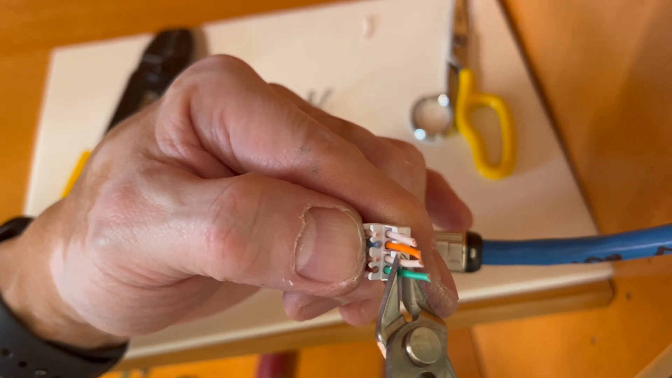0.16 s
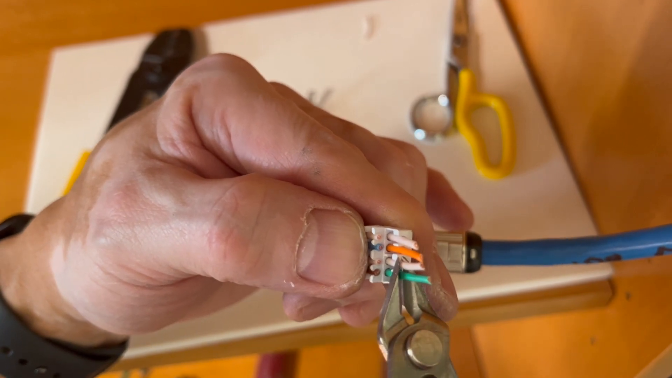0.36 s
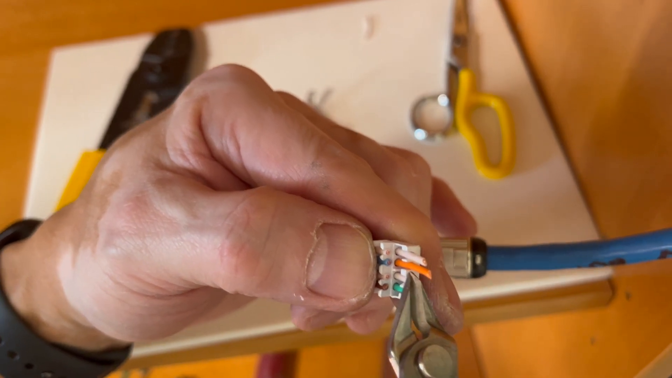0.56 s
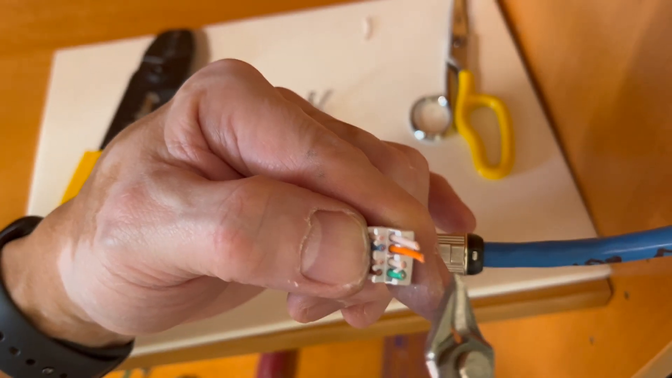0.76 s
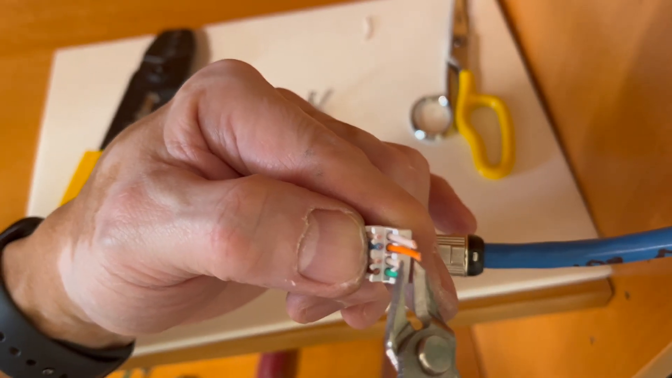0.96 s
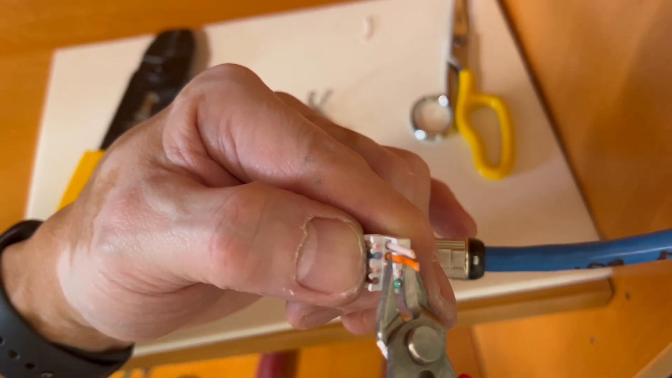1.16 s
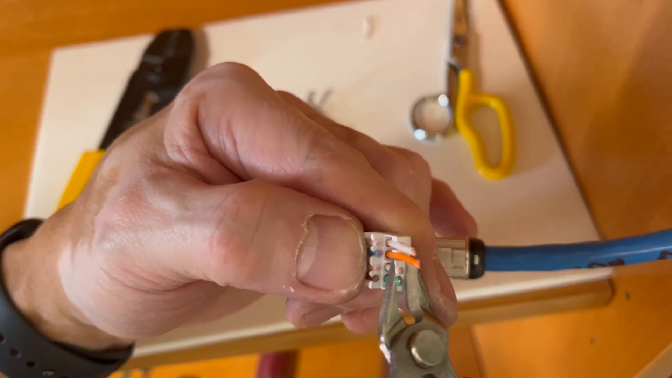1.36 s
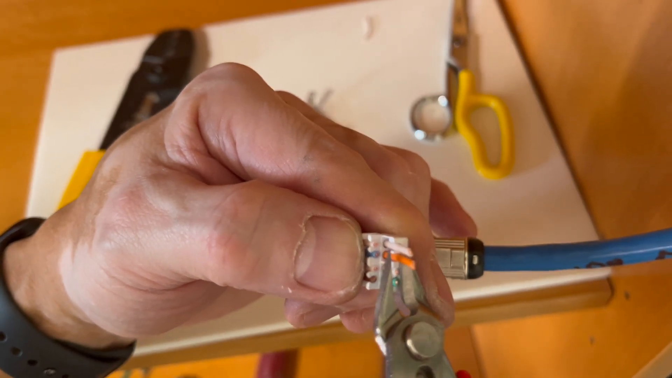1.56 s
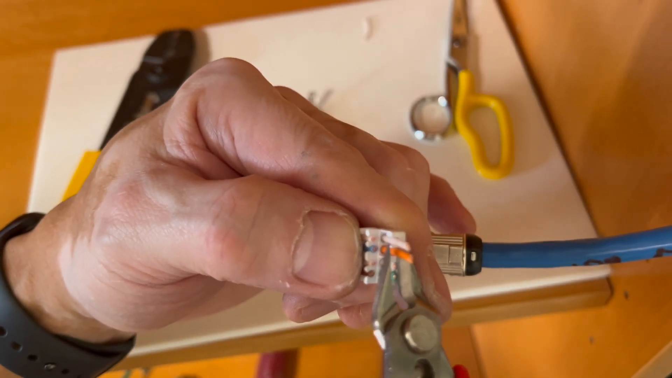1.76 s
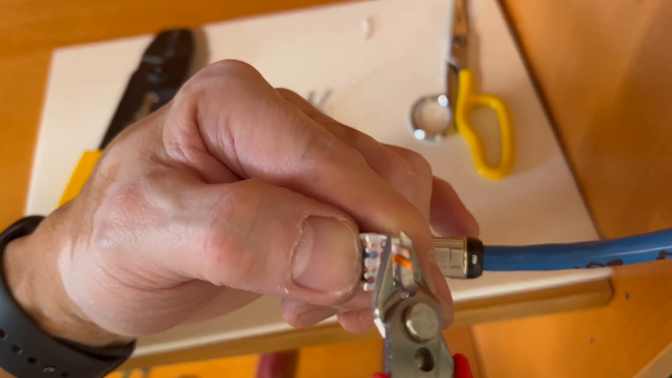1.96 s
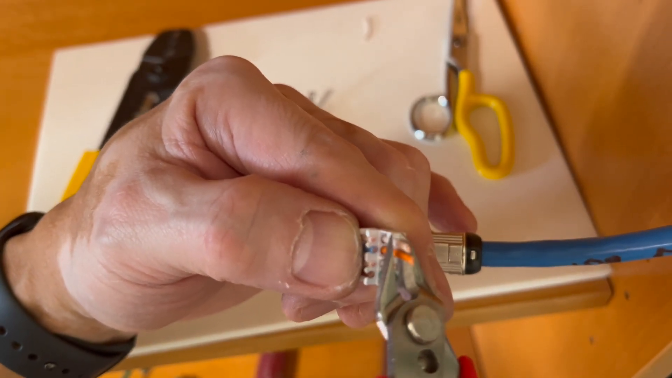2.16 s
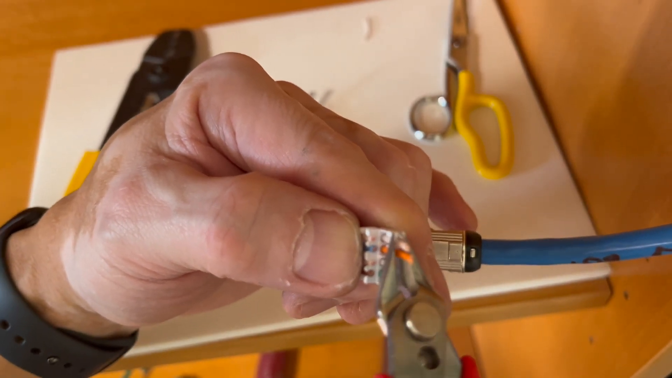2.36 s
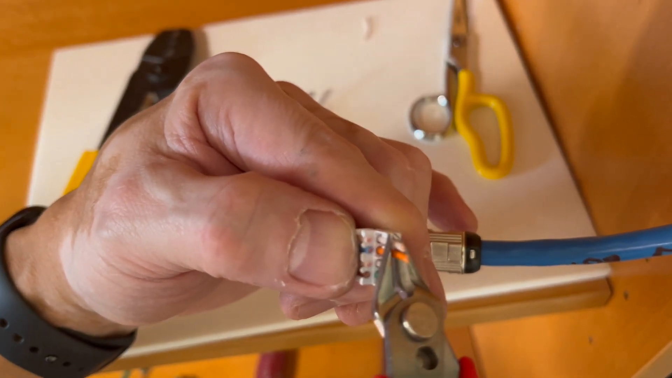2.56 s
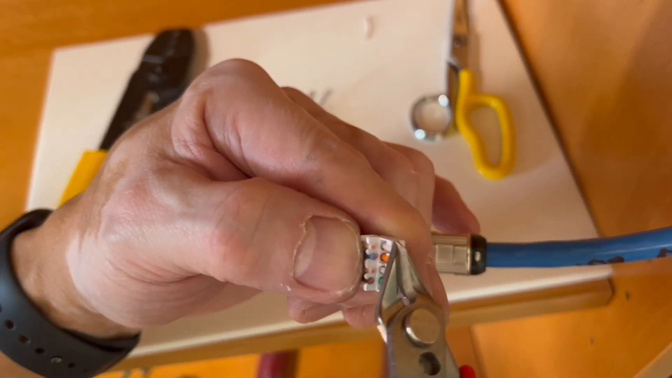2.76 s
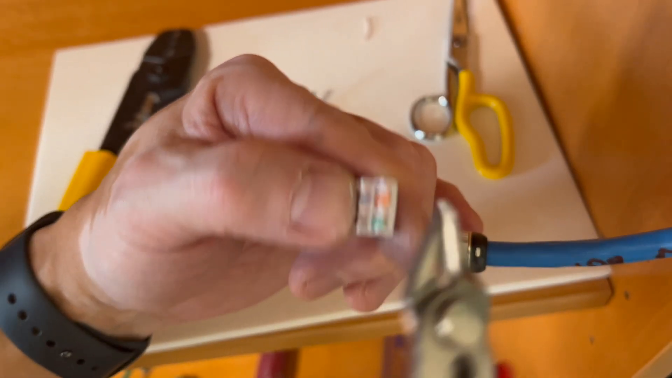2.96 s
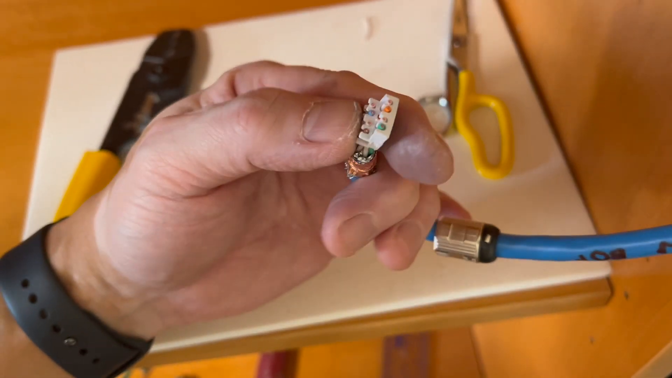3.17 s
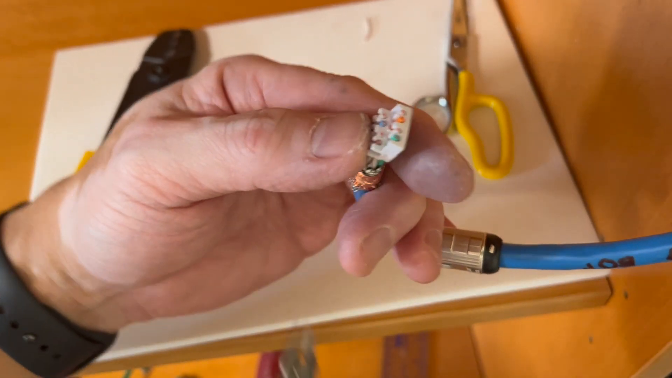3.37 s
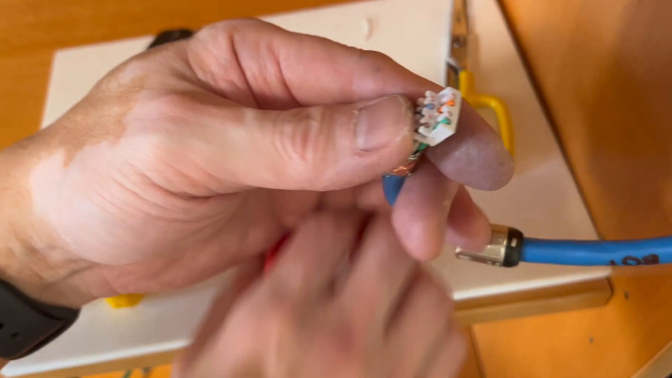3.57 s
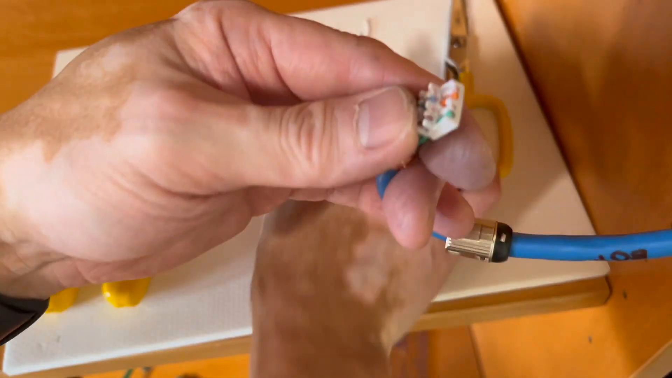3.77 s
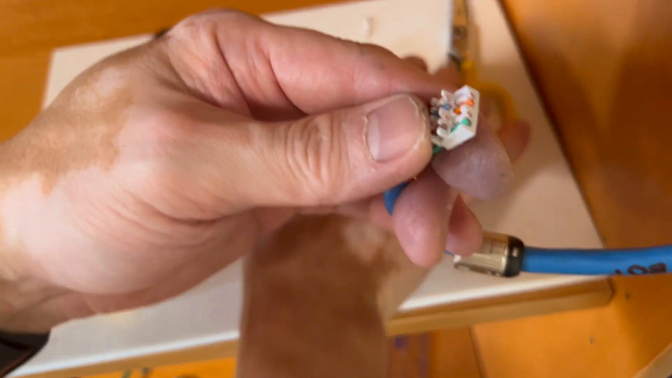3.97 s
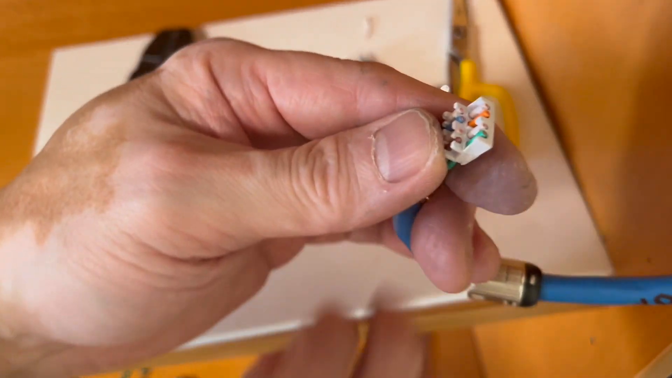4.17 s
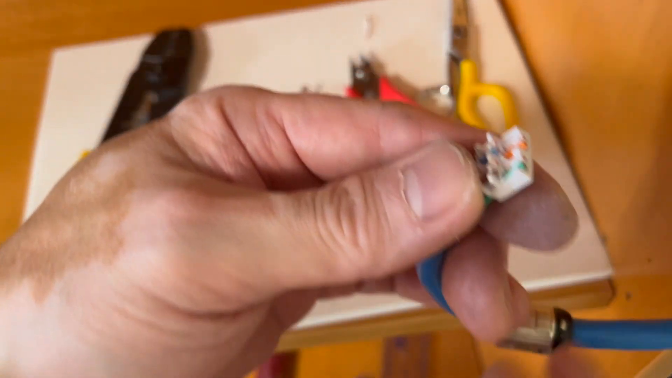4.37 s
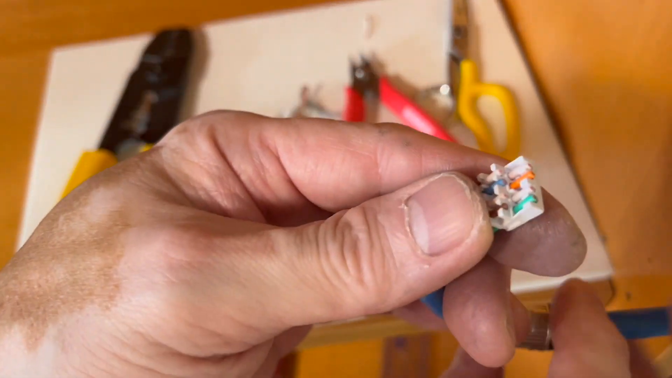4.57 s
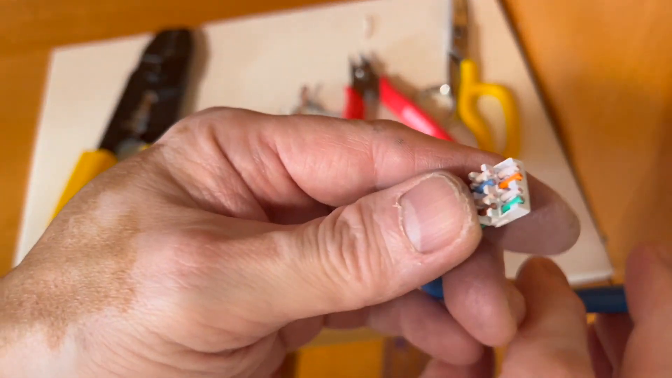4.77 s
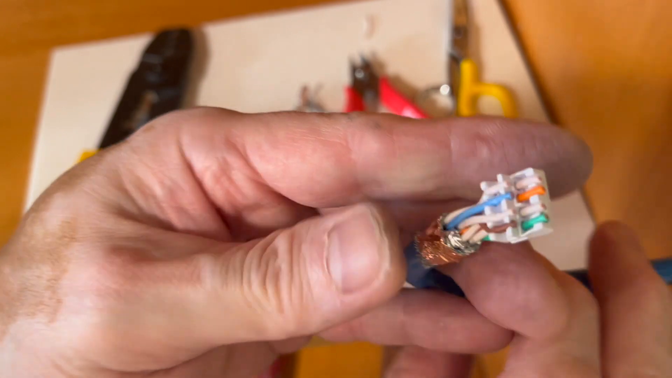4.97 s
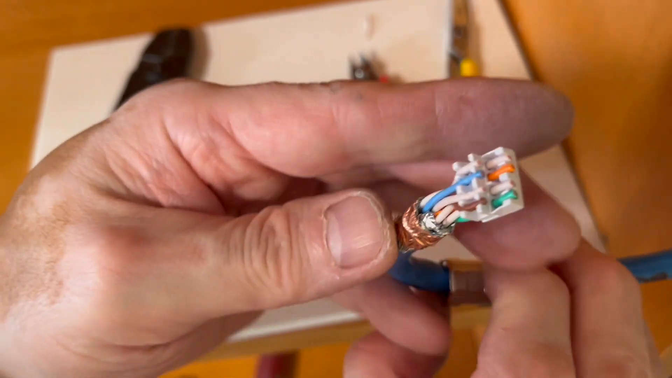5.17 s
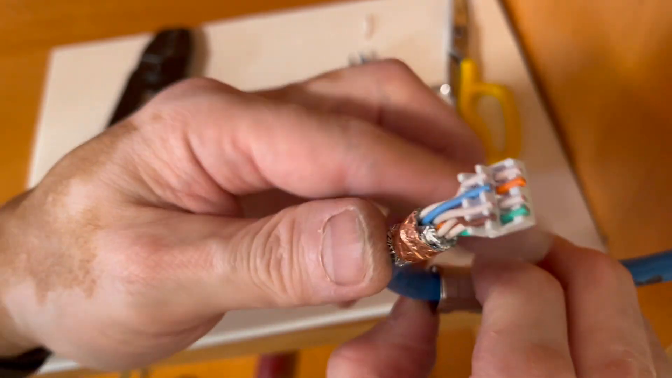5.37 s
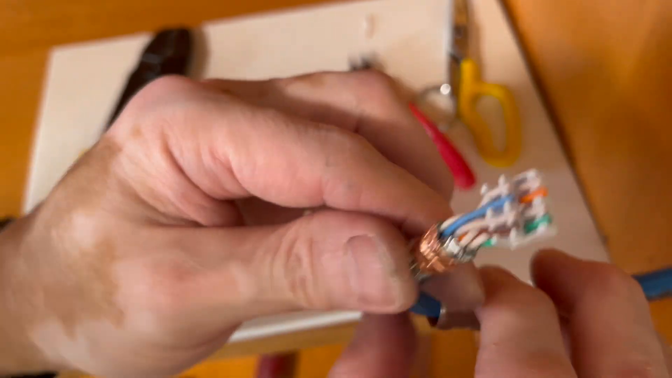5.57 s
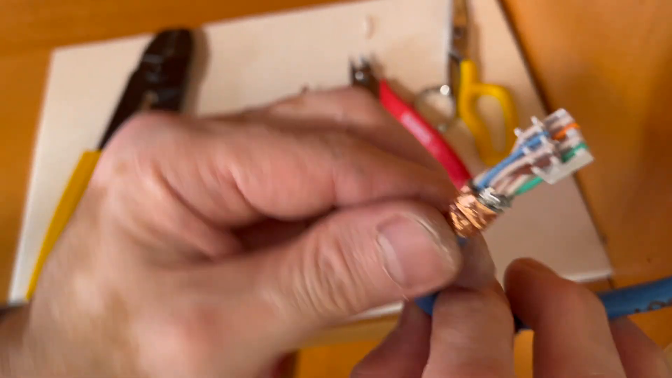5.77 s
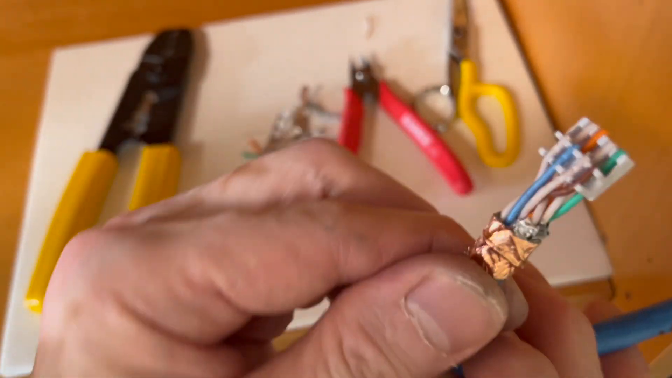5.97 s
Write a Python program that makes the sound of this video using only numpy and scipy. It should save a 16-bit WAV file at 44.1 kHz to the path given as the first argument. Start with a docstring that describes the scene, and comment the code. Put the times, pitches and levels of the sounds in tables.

```python
"""Flush cutters trim wire ends at a cable plug, close to the microphone, above a workbench in a small room.
Twice the jaws snap through a wire: a crack of noise over ringing steel modes. The offcut skitters away
in bright clicks, and jaws and plug tick in short gritty bursts between the cuts. The cutters are put down
with a thud of bench modes, then fingers turn the plug and rub along the cable, as swelling grainy noise.
A diffuse echo and a low rumble under faint hiss fill the room around the stereo microphone."""
import sys
import numpy as np
from scipy import signal
from scipy.fft import rfft, irfft, next_fast_len
from scipy.io import wavfile
from scipy.ndimage import uniform_filter1d

SR = 44100
rng = np.random.default_rng(int(sys.argv[2]) if len(sys.argv) > 2 else 0)


def bounce(signal):
    """Save signal as a 16-bit WAV file at the path given by the first command-line argument."""
    frames = np.transpose(np.atleast_2d(signal))
    limited = np.clip(frames, -1, 1)
    pcm = np.round(limited * 32767).astype(np.int16)
    wavfile.write(sys.argv[1], SR, pcm)


N = 266099
AGE = np.arange(SR // 2) / SR  # seconds since a blow


def undb(db):
    """Decibels to gain."""
    return 10 ** (np.asarray(db) / 20)


def unit(x):
    """Scale to unit energy."""
    return x / np.sqrt(np.sum(x ** 2, axis=-1, keepdims=True))


def unit_energy_check(x):
    """Energy of a sound along time."""
    return np.sum(x ** 2, axis=-1, keepdims=True)


def add(track, s, sound):
    """Mix a sound in at time s."""
    start = int(s * SR)
    track[:, start:start + sound.shape[-1]] += sound[..., :N - start]


def convolve(x, response):
    """Pass a sound through an impulse response."""
    full = signal.fftconvolve(np.atleast_2d(x), np.atleast_2d(response), axes=-1)
    return full[:, :x.shape[-1]]


def colour(x, points, tilt_db=0, size=8192):
    """Causal unit-energy filter shaped by (Hz, dB) points, tilted per octave."""
    hz, db = np.transpose(points)
    octave = np.log2(np.clip(np.fft.rfftfreq(size, 1 / SR), hz[0], hz[-1]))
    curve_db = np.interp(octave, np.log2(hz), db) + tilt_db * octave
    # folding the cepstrum forward gives minimum phase
    cepstrum = irfft(np.log(undb(curve_db)))
    cepstrum[1:size // 2] *= 2
    cepstrum[size // 2 + 1:] = 0
    response = irfft(np.exp(rfft(cepstrum)))
    return convolve(x, unit(response))


def fade(t60):
    """Exponential decay by 60 dB in t60 seconds."""
    return np.exp(-np.log(1000) * AGE / t60)


def ring(modes, spread_db=-0.22):
    """Damped modes of alternating sign; the point of impact shifts their strengths."""
    out = np.zeros(len(AGE))
    for k, (hz, db, t60) in enumerate(modes):
        strength = undb(db + spread_db * rng.standard_normal())
        out += (-1) ** k * strength * fade(t60) * np.sin(2 * np.pi * hz * AGE)
    return out


def contact(t60, grain_db):
    """A dying crowd of tiny fractures and slips, of widely spread sizes."""
    size, spread = rng.standard_normal((2, len(AGE)))
    return unit(size * undb(grain_db * spread) * fade(t60))


def walk(rate):
    """Smoothed chance, with this many new values per second."""
    k = int(SR / rate)
    steps = np.repeat(rng.standard_normal(N // k + 1), k)
    return uniform_filter1d(steps, k)[:N]


def scatter(sound, db, t60):
    """Hands and bench throw a short spray of echoes to each port."""
    spray = unit(rng.standard_normal((2, len(AGE))) * fade(t60))
    return (sound + undb(db) * convolve(sound, spray)) / np.hypot(1, undb(db))


# The cutters at the microphone snap shut, spring open or get knocked.
# Each row: start in seconds, level in dB, crack in dB relative to the ringing steel.
SNAPS = [(0.5112, 5.5, -1), (0.763, -24.5, -23.5), (1.011, -31.5, -20), (1.3324, -41, -30),
         (2.6955, 1.5, 3.5), (3.003, -27.5, -2.5), (3.362, -30, -22.5), (3.789, -37.5, 4),
         (5.842, -21.5, 12.5)]
# Ringing modes of the cutters. Each row: frequency in Hz, level in dB, t60 in seconds when the jaws ring fully.
JAW_MODES = [(360, -22.5, .05), (1230, -20, 0.0098), (1760, -4.5, 0.002), (2190, -1.5, 0.039),
             (2400, -2, 0.018), (2560, -0.5, 0.012), (3970, -16, 0.038), (4660, -13, 0.0091),
             (5160, -15.5, 0.063), (8400, -14, .014), (8800, -24.5, .03), (9300, -17, 0.019),
             (12150, -22, 0.015)]
# Spectrum of the parting wire. Each row: frequency in Hz, relative level in dB.
CRACK = [(150, -18), (350, -1), (650, -7.5), (1000, -7), (1500, -3), (2600, 2.5), (3500, -5), (5000, 1.5),
         (9000, -1), (11000, -5.5), (15500, -8)]
# jaws that barely touch ring for this share of their full time; from this level (dB) up they ring fully
LOOSE_T60_SHARE, TIGHT_DB = .3, -2


def jaws():
    """The wire parts with a crack; the jaws slam together and ring, more briefly after a light touch."""
    out = np.zeros((2, N))
    for s, db, crack_db in SNAPS:
        share = np.interp(undb(db), [0, undb(TIGHT_DB)], [LOOSE_T60_SHARE, 1])
        steel = unit(ring([(hz, mode_db, t60 * share) for hz, mode_db, t60 in JAW_MODES]))
        crack = colour(contact(.005, grain_db=5), CRACK)
        snap = scatter(steel + undb(crack_db) * crack, db=-2.5, t60=0.055)
        add(out, s, undb(db) * snap)
    return out


# Offcuts fly off and strike things. Each row: start in seconds, level in dB, ring frequency in Hz,
# ring in dB relative to the click, contact t60 in seconds.
OFFCUTS = [(0.5438, 5.5, 4500, -0.5, .006), (0.5414, 3, 13000, -0.5, 0.0028),
           (0.5444, -2, 8400, -0.5, 0.0088), (0.551, -6.5, 7200, 1.5, 0.0091), (0.554, -4, 4800, 4, .01),
           (0.559, -7.5, 8800, 1, 0.0044), (0.5671, 1, 4305, -10, .002), (0.5718, -2.5, 1600, -7.5, .002),
           (2.737, -1, 10200, 5, 0.0051), (2.7546, -8.5, 4310, -3.5, .004),
           (2.7565, -16.5, 4460, 6.5, 0.012), (2.7608, -6, 4300, -26, 0.0034)]
# Spectrum of a wire end clicking on something. Each row: frequency in Hz, relative level in dB.
WIRE = [(200, -14.5), (1000, -12), (2500, -10), (4200, 1), (6000, 1), (8500, 0.5), (13000, -3.5),
        (15500, -17.5)]


def offcuts(cycles=24):
    """A bright click with a ring of whatever is hit, dying by 60 dB in a set number of cycles."""
    out = np.zeros((2, N))
    for s, db, hz, ring_db, t60 in OFFCUTS:
        click = colour(contact(t60, grain_db=5.0), WIRE)
        tone = unit(ring([(hz, 0, cycles / hz), (hz * 1.9, -5, cycles / hz)]))
        strike = scatter(click + undb(ring_db) * tone, db=-4.5, t60=0.052)
        add(out, s, undb(db) * strike)
    return out


# Spectrum of touches at the plug. Each row: frequency in Hz, relative level in dB.
PLUG = [(300, -5.5), (1200, -5), (2200, 1.5), (4500, 8.5), (8500, 3.5), (13000, -1), (15500, -14.5)]
# Blades, wire ends and plug touch. Each row: start in seconds, level in dB, tilt in dB per octave,
# contact t60 in seconds.
TICKS = [(1.0065, -24, -1.5, 0.043), (1.8374, -45.5, -2.5, 0.039), (3.0876, -26.5, -0.5, 0.0093),
         (3.22, -25.5, -1, 0.029), (3.296, -27, -8.5, 0.032), (3.6951, -22.5, 7.5, 0.01),
         (3.8223, -20.5, 6.5, 0.028), (3.8765, -18.5, 23, 0.051), (4.028, -31.5, 8.5, 0.036),
         (4.3754, -34, 6, 0.0098), (4.7064, -38, 6.5, 0.037), (4.855, -28.5, 12.5, 0.0077),
         (5.403, -40, 11.5, 0.011), (5.8432, -14.5, 3.5, 0.0087)]


def ticks(table, scatter_db):
    """Short gritty contacts, each with its own tilt and decay."""
    out = np.zeros((2, N))
    for s, db, tilt_db, t60 in table:
        touch = colour(contact(t60, grain_db=6), PLUG, tilt_db)
        add(out, s, undb(db) * scatter(touch, scatter_db, t60=0.11))
    return out


# An offcut bounces further away. Each row: start in seconds, level in dB.
BOUNCES = [(0.81, -22.5), (1.054, -25), (1.1005, -25.5), (1.2023, -25), (1.2312, -29.5), (1.4066, -38.5),
           (1.4553, -33.5), (1.5366, -38.5), (1.5966, -41)]
BOUNCE_TILT_DB, BOUNCE_T60_S = -1, 0.036  # per octave; decay of each contact


def bounces():
    """Every bounce of an offcut is the same kind of gritty contact at its own strength."""
    return ticks([(s, db, BOUNCE_TILT_DB, BOUNCE_T60_S) for s, db in BOUNCES], scatter_db=-0.5)


# Knocks of cutters, hands and cable on the bench. Each row: start in seconds, level in dB,
# relative clack level in dB.
KNOCKS = [(0.566, -58.5, 6), (1.015, -61, 11), (1.335, -59.5, 1.5), (1.846, -52.5, -1.5),
          (2.737, -52.5, 6.5), (2.981, -50.5, -4.5), (3.296, -48.5, -3.5), (3.597, -44.5, 1),
          (3.834, -30, 5), (3.843, -14.5, -18.5), (3.899, -24.5, -22), (4.357, -39.5, 0), (4.974, -46.5, 8),
          (5.097, -49, 2.5), (5.18, -43.5, -0.5), (5.386, -48.5, 4), (5.412, -41, -13), (5.728, -55, 1.5),
          (5.845, -45, -8.5)]
# Modes of the bench top. Each row: frequency in Hz, level in dB, t60 in seconds.
BENCH_MODES = [(120.8, -2.5, 0.12), (139.4, -1, 0.27), (180.4, -7.5, 0.22), (203, -8, 0.34),
               (290, -14, 0.4), (333.6, -11.5, 0.2), (467, -21.5, .13), (615.6, -33, .12), (44, -22.5, .5),
               (91.7, -21.5, .3)]
# Spectrum of things tapping and rattling on the bench. Each row: frequency in Hz, relative level in dB.
CLACK = [(90, -18.5), (200, 6), (350, 2), (600, -9.5), (900, -18.5), (2200, -27), (10000, -50)]
PUSH_S = .0031  # how long a knock presses on the bench top
JOLT_DB, JOLT_CLACK_DB = -40.5, -1  # jolt through the hand, relative to its snap; its relative clack
TAP_DB, TAP_T60_S = -4, 0.055  # the first contact of a knock, relative to the rattle with it


def bench():
    """Each knock, and the jolt of each snap, rings the bench top; things lying on it tap and rattle."""
    out = np.zeros((2, N))
    push = np.sin(np.pi * np.minimum(AGE / PUSH_S, 1))
    jolts = [(s, db + JOLT_DB, JOLT_CLACK_DB) for s, db, _ in SNAPS]
    for s, db, clack_db in KNOCKS + jolts:
        wood = convolve(ring(BENCH_MODES), push / push.sum())
        tap = undb(TAP_DB) * contact(TAP_T60_S, grain_db=2)
        rattle = contact(0.32, grain_db=4)
        clack = 12 * colour(tap + rattle, CLACK)
        add(out, s, undb(db) * (wood + undb(clack_db) * scatter(clack, db=-5.5, t60=.04)))
    return out


STROKE_POWER = 0.61  # a stroke speeds up and slows down in a half sine; loudness follows this power of the speed


def rub(strokes, spectrum, db, grain_db, flutter_db):
    """Tiny catches and slips that swell with each stroke and flutter with finger pressure."""
    t = np.arange(N) / SR
    effort = np.zeros(N)
    for s, length, stroke_db in strokes:
        speed = np.sin(np.pi * np.clip((t - s) / length, 0, 1))
        effort += undb(stroke_db) * speed ** STROKE_POWER
    grains = rng.standard_normal((2, N)) * undb(grain_db * rng.standard_normal(N))
    flutter = flutter_db * (walk(5.2) + walk(190))
    return colour(grains / grains.std() * effort * undb(db + flutter), spectrum)


# Skin slides on plastic. Each row is a stroke: start in seconds, length in seconds, relative level in dB.
SLIDES = [(3.44, 0.039, -61.5), (3.53, .2, -65.5), (3.575, .09, -58), (3.815, 0.061, -46),
          (3.868, 0.076, -49), (3.94, 0.04, -66), (4.12, 0.14, -74), (4.42, 0.37, -77), (4.88, 0.15, -69.5),
          (4.98, 0.39, -74), (5.34, 0.23, -79.5), (5.53, 0.1, -73), (5.65, 0.22, -74)]
# Spectrum of sliding skin. Each row: frequency in Hz, relative level in dB.
SKIN = [(1000, -15), (2300, -10), (3200, -11), (5000, -2), (12500, 0), (15500, -1)]


def slides():
    """Skin catches and slips on plastic, brightly."""
    return rub(SLIDES, SKIN, db=4, grain_db=4.0, flutter_db=3.5)


# The cable drags through the hand. Each row is a pull: start in seconds, length in seconds,
# relative level in dB.
DRAGS = [(3.43, 0.42, -69.5), (3.81, 0.054, -49), (3.88, 0.54, -69.5), (4.36, 0.5, -76.5),
         (4.975, 0.326, -73.5), (5.915, 0.43, -55)]
# Spectrum of the dragging cable. Each row: frequency in Hz, relative level in dB.
CABLE = [(120, -11), (300, 3), (550, -5), (1000, -11.5), (2300, -13.5), (3100, -21), (8000, -29.5)]


def drags():
    """The cable catches and slips in the hand, dully and with little flutter."""
    return rub(DRAGS, CABLE, db=2.5, grain_db=5.5, flutter_db=0.5)


# Cut wire ends scrape in the plastic plug. Each row is a stroke: start in seconds, length in seconds,
# relative level in dB.
SCRAPES = [(3.02, 0.16, -67.5), (3.195, 0.088, -58), (3.27, 0.28, -72.5), (3.44, 0.13, -73),
           (4.05, .55, -78), (5.6, 0.078, -75)]
# Spectrum of that scraping. Each row: frequency in Hz, relative level in dB.
SCRAPE = [(600, -14), (1500, -3.5), (2400, 1), (3100, -5.5), (4500, 0.5), (8000, -6.5), (15000, -13)]


def scrapes():
    """Wire ends catch and slip on plastic, in coarse grains."""
    return rub(SCRAPES, SCRAPE, db=1, grain_db=6, flutter_db=4.0)


# Echo of the small room. Each row: frequency in Hz, relative level in dB, t60 in seconds.
ROOM = [(150, -19.5, 0.91), (500, -16.5, 0.31), (1531.5, -16, 0.39), (4000, -18, .42), (8000, -15, 0.33),
        (15000, -23, 0.12)]


def room(x, db):
    """Direct sound plus a diffuse echo that builds up quickly; each band has its own decay."""
    bins = np.fft.rfftfreq(len(AGE), 1 / SR)
    centres = np.array(ROOM)[:, 0]
    noise = rfft(rng.standard_normal((2, len(AGE))))
    tail = np.zeros((2, len(AGE)))
    for (_, band_db, t60), share in zip(ROOM, np.eye(len(ROOM))):
        band = irfft(noise * np.interp(bins, centres, share))  # crossfades into its neighbours
        tail += undb(band_db) * unit(fade(t60)) * band
    return x + undb(db) * convolve(x, tail * (1 - np.exp(-AGE / .006)))


# Spectrum of the quiet room at the microphone. Each row: frequency in Hz, relative level in dB.
AIR = [(25, -22.5), (38, -12), (59, -1), (92, -3), (120, -16), (180, -26.5), (500, -34.5), (1000, -45),
       (2000, -46), (4500, -48), (16000, -58.5)]
AIR_DB = -61


def air():
    """Low rumble, alike at both ports, under a faint wide hiss."""
    mid, side = colour(rng.standard_normal((2, N)), AIR)
    side = signal.sosfilt(signal.butter(1, 400, "high", fs=SR, output="sos"), side)
    return undb(AIR_DB) * np.array([mid + side, mid - side])


def scene():
    """Cuts, ticks and handling over the quiet room; each room level sets the echo alone."""
    cuts = room(jaws(), db=-1.5) + room(offcuts(), db=-4.5)
    small = room(ticks(TICKS, scatter_db=-2.5), db=9.5) + room(bounces(), db=12.5)
    hands = room(slides() + drags() + scrapes(), db=6.5)
    return cuts + small + hands + room(bench(), db=2) + air()


# The stereo microphone's two ports. Each row: frequency in Hz, lead of left over right in turns,
# width in dB.
PORTS = [(150, 0, -3), (450, -.12, 0), (750, -.2, 4), (1100, -.1, 3), (1500, -.05, -2), (2700, .35, 0),
         (3800, .14, 0), (5000, .24, 0), (6000, .5, -10), (8000, 1, -13), (14700, 2.5, -13)]
TOP_HZ = 16400


def record(dry):
    """The microphone pair shifts left against right by frequency, sets the width and cuts the top."""
    size = next_fast_len(N + SR)
    hz, turns, width_db = np.transpose(PORTS)
    bins = np.fft.rfftfreq(size, 1 / SR)
    left, right = rfft(dry, size)
    mid = (left + right) / 2
    side = (left - right) / 2 * undb(np.interp(bins, hz, width_db))
    lead = np.exp(1j * np.pi * np.interp(bins, hz, turns))  # half the turn on each side
    pair = irfft(np.array([(mid + side) * lead, (mid - side) / lead]), size)[:, :N]
    return signal.sosfilt(signal.ellip(8, .2, 70, TOP_HZ, fs=SR, output="sos"), pair)


dry = scene()
out = record(dry)
bounce(out)
```